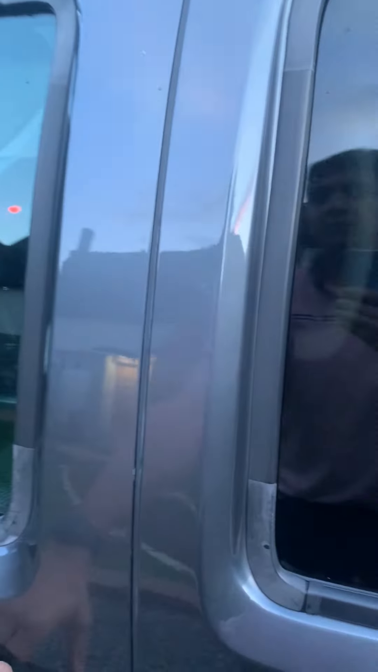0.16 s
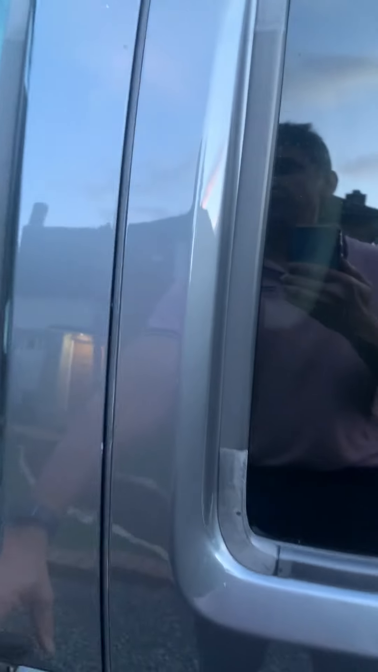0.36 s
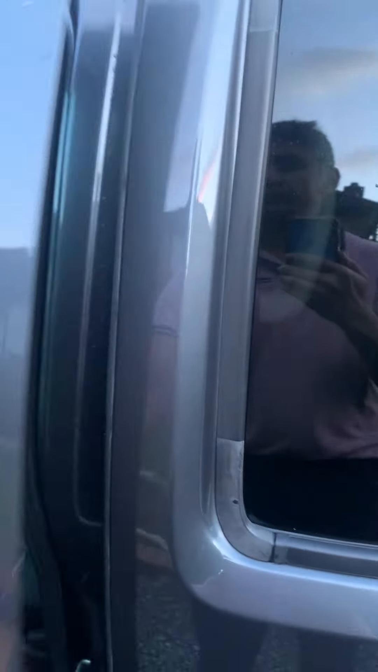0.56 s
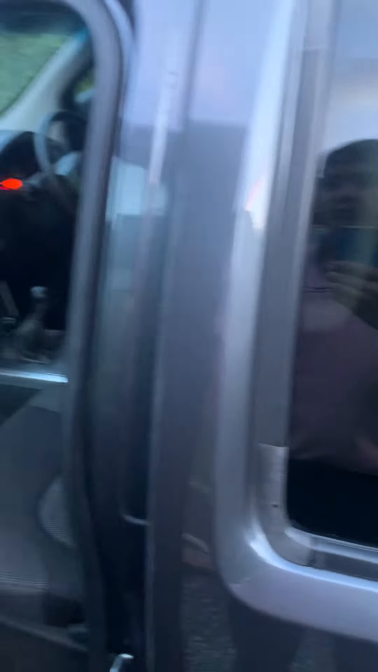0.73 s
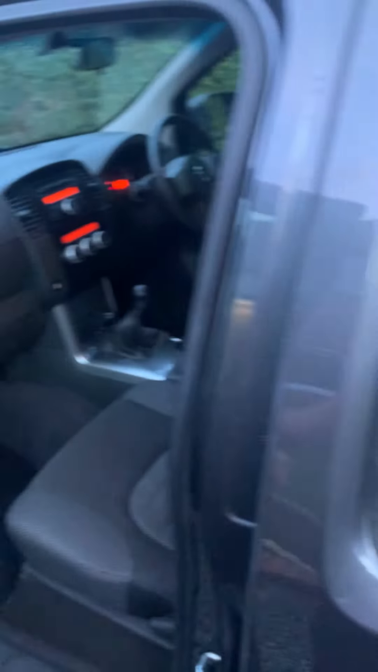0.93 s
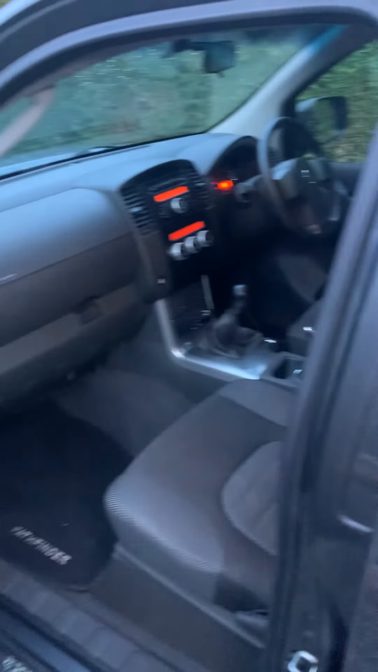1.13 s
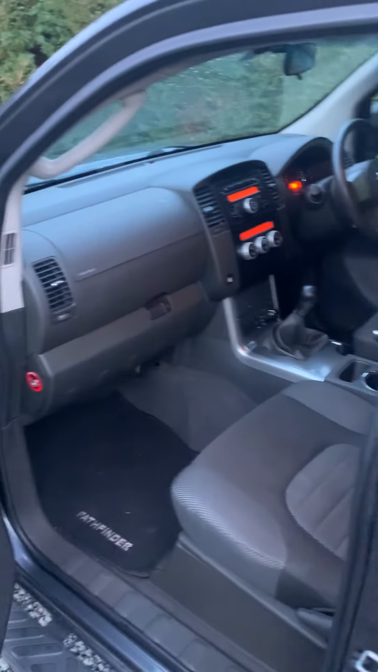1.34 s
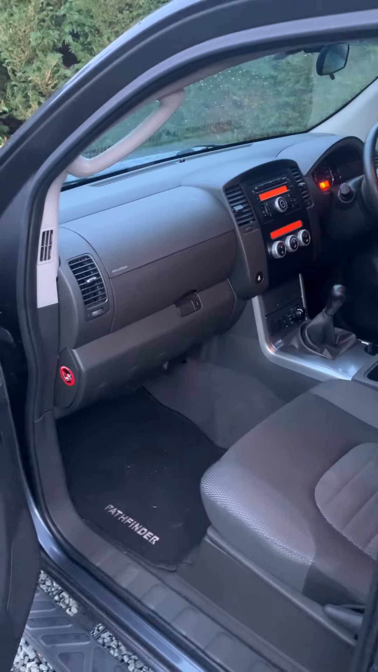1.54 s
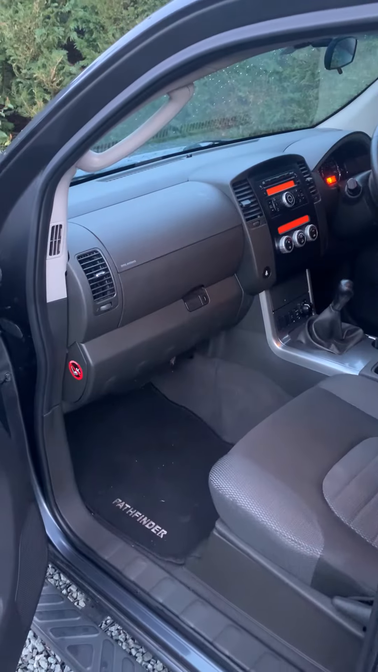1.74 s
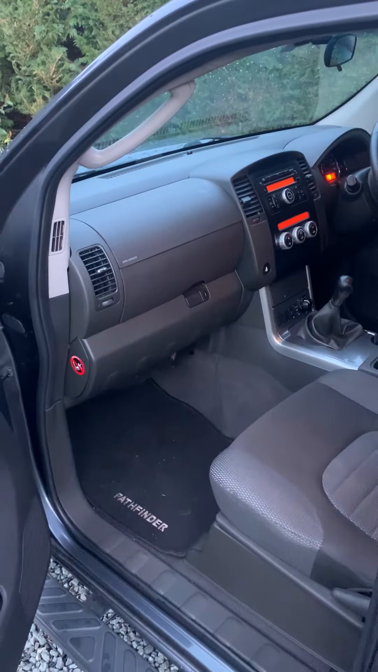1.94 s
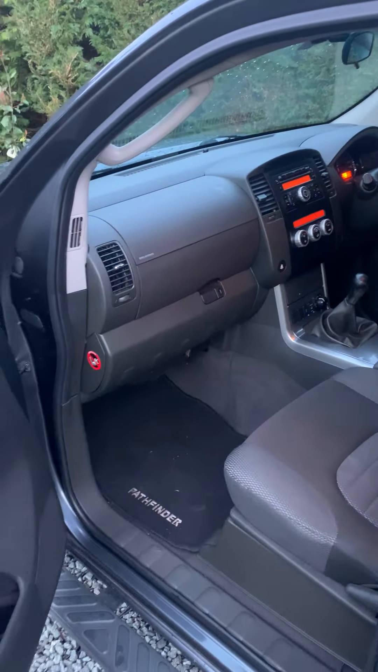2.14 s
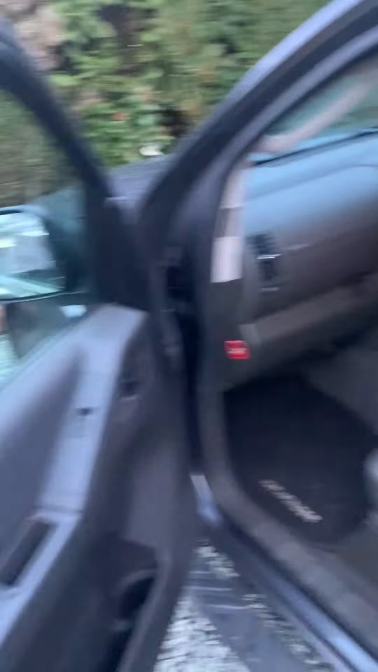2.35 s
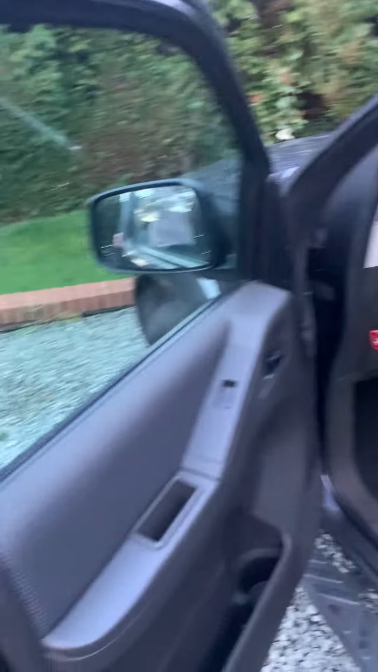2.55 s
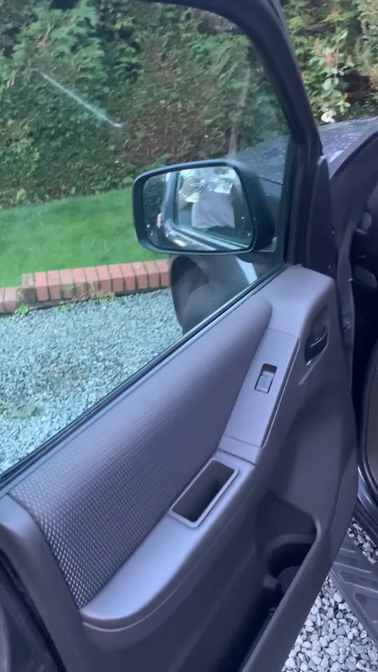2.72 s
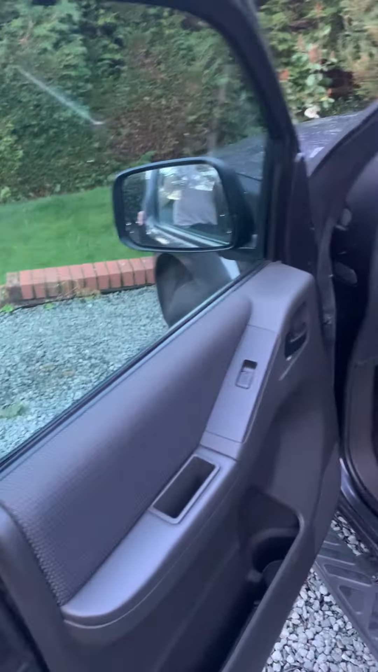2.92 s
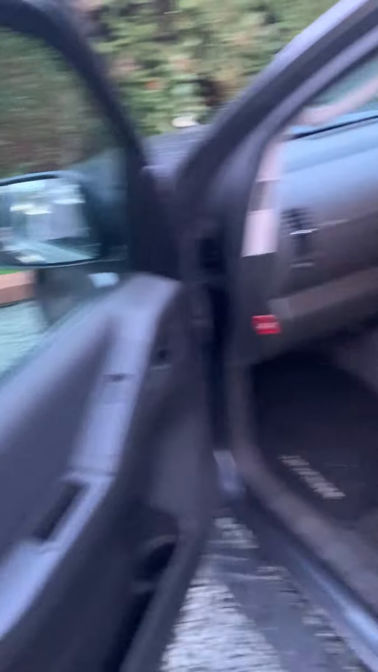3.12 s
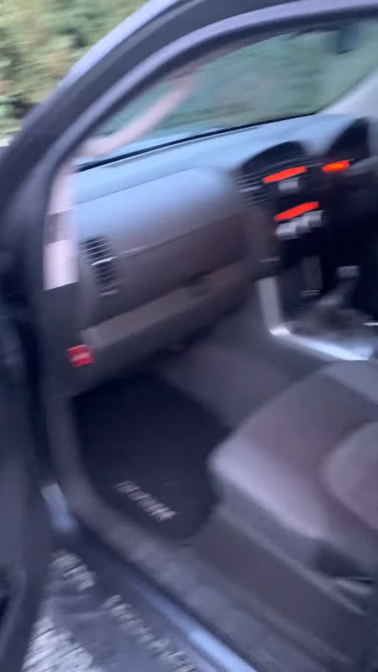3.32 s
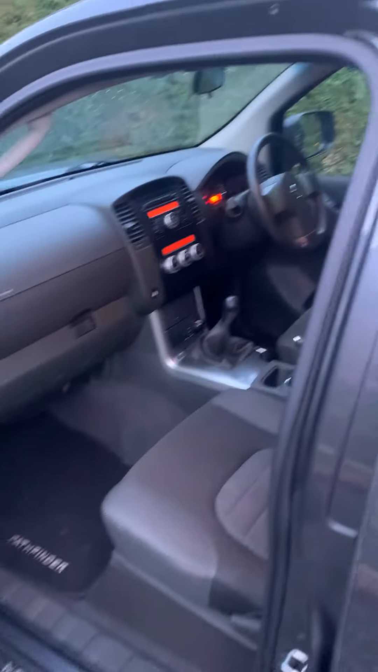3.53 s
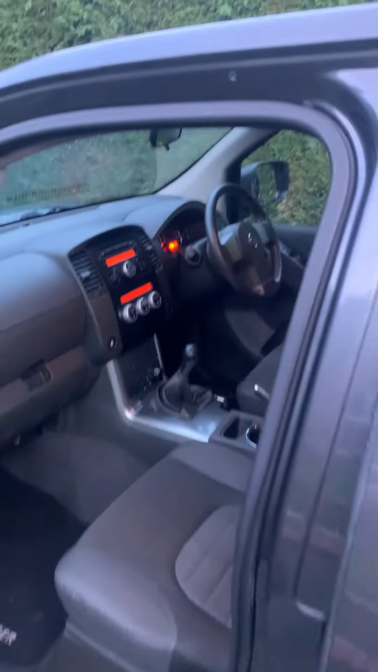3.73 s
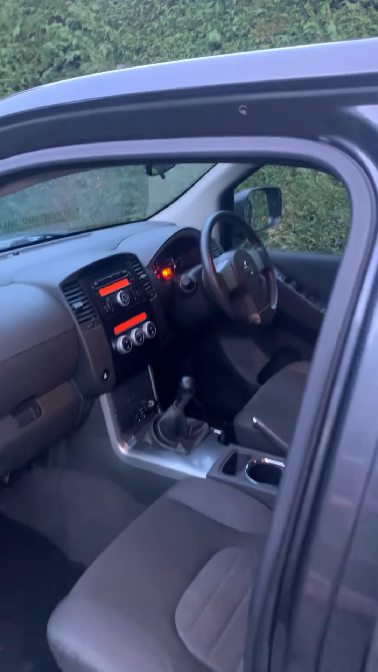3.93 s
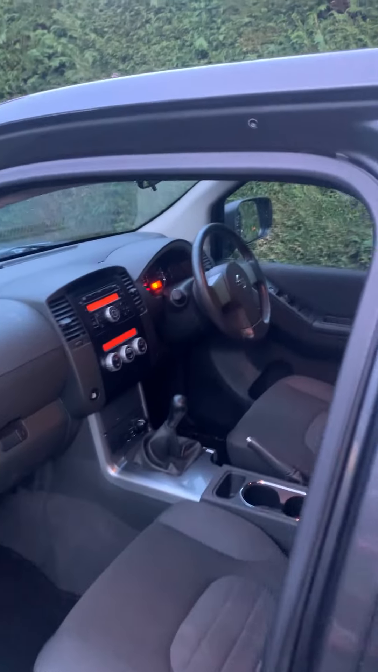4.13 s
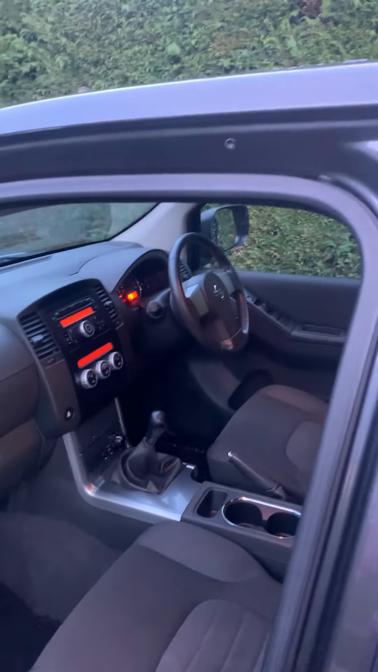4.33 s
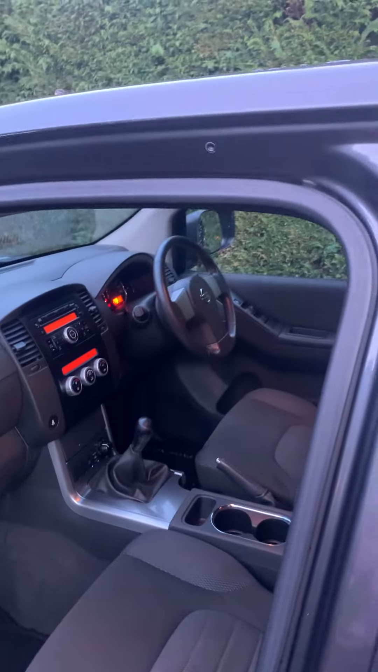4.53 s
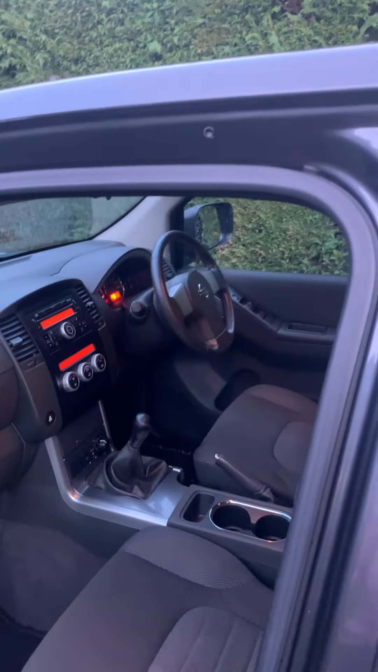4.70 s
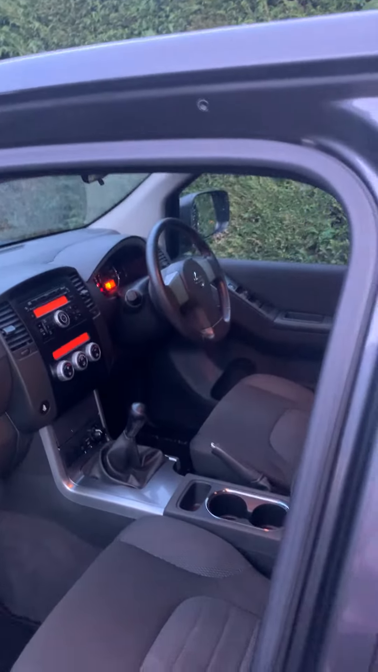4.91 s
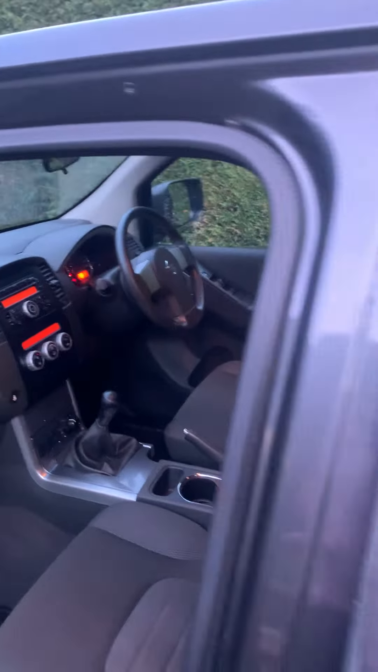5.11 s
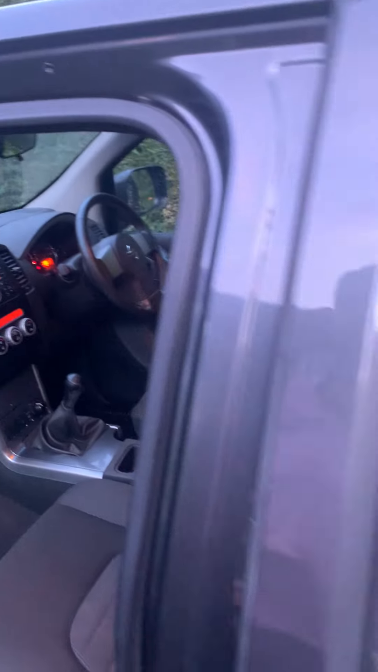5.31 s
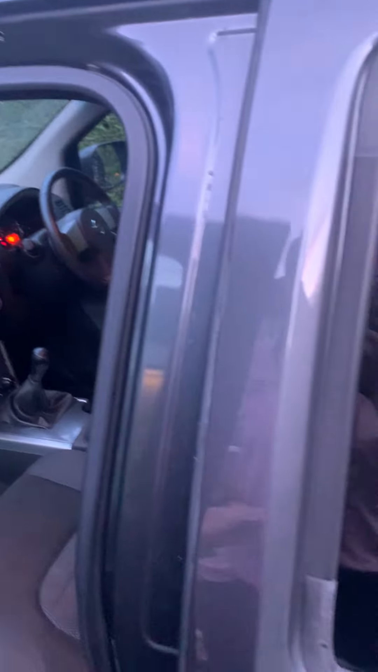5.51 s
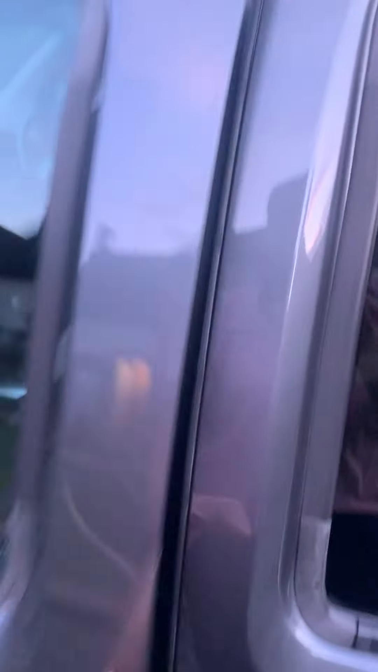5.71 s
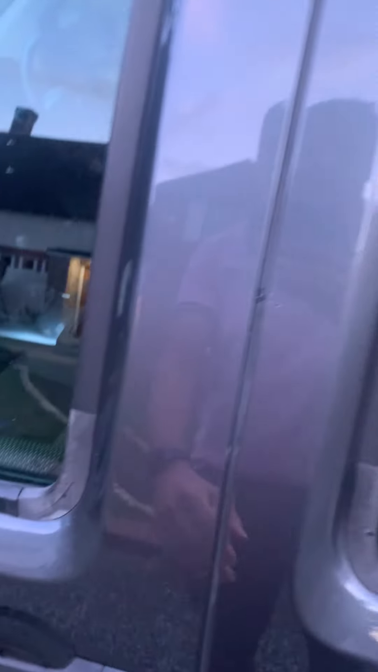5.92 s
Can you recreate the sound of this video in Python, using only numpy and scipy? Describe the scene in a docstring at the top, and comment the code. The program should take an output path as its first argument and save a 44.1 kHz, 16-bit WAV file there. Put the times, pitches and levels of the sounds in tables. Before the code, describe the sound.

Outdoors, a hand-held phone close to a pickup picks up its rough diesel idle. The passenger door is unlatched with a hollow clunk, then bumps and rattles at full opening. The engine purrs and clatters alone, a few muffled low footsteps thump, and finally the door shuts with an explosive metallic crunch and deep panel boom, bouncing and rattling briefly in stereo.

```python
"""On a gravel drive a four-cylinder diesel pickup idles. Someone beside it pulls the passenger door open,
lets it swing to its stop, shifts their feet and slams it right next to a hand-held phone.
The engine is harmonics of the firing rate, noise pulsed by the firings and a fan tone beating against them.
The door is a modal panel excited by pushes, chattering resonant steel and a chinking rod;
footfalls are low pulses, and clothes, grit, hinge and air are filtered noise."""
import sys
import numpy as np
from scipy import signal
from scipy.fft import rfft, irfft
from scipy.io import wavfile
from scipy.ndimage import uniform_filter1d

SR = 44100
rng = np.random.default_rng(int(sys.argv[2]) if len(sys.argv) > 2 else 0)


def digitize_waveform(pressure):
    """Quantize a signal to 16-bit integers and store it at the path in sys.argv[1].

    Rows of a 2-D input are taken as channels; values are limited to [-1, 1].
    """
    field = np.atleast_2d(pressure).T
    bounded = np.clip(field, -1, 1)
    quanta = np.round(bounded * 32767).astype(np.int16)
    wavfile.write(sys.argv[1], SR, quanta)


N = 262836
T = np.arange(N) / SR  # s

# Harmonics of the firing rate, exhaust drone then block hum from the ninth: order [multiple], level_db [dB]
FIRING_ORDERS = [(1, -0.5), (2, 6), (3, 5), (4, 0), (5, 0), (6, -5.5), (7, -12.5), (8, -12.5), (9, -6.5),
                 (10, -7.5), (11, -9.5), (12, -12), (13, -3), (14, -27), (15, -9.5), (16, -12.5), (17, -16),
                 (18, -26)]
# Relative noise spectra, all with columns: frequency_hz [Hz], level_db [dB per Hz]
# knock in the block
KNOCK_SPECTRUM = [(100, -2), (150, -11.5), (200, 0), (260, -1.5), (320, 0), (400, -4.5), (550, -13.5),
                  (1500, -29), (8000, -50)]
# valve and piston clatter
CLATTER_SPECTRUM = [(300, -3), (400, 0), (540, -10), (720, -7), (1000, -6), (1300, -10.5), (1650, -13),
                    (2200, -25.5), (3600, -79), (5000, -26), (8000, -43), (15000, -45)]
# injector ticks
INJECTOR_SPECTRUM = [(1200, 0.5), (2200, 3), (3500, 1), (5000, -3), (6100, -7.5), (6650, 4), (7700, -13.5),
                     (11000, -16.5), (15500, -10)]
# moving outdoor air
AIR_SPECTRUM = [(42, -17), (60, 2), (110, -3), (200, -12), (600, -27), (3000, -33.5), (15000, -67)]
# rubbing surfaces: cloth, stones, hinge
FRICTION_SPECTRUM = [(150, 16), (600, 6), (2000, 6), (4000, 5.5), (7000, -1.5), (10000, -10.5), (15500, -8)]
# shudder of the body, and the hand on the phone
RUMBLE_SPECTRUM = [(45, -1), (75, -2), (160, -7), (260, -22), (500, -32), (2000, -70)]
# chatter of the latch
LATCH_SPECTRUM = [(120, -25), (350, 4), (520, 4), (700, 4), (1250, 6), (2200, -0.5), (3000, 1.5),
                  (4000, -3.5), (6000, -2), (8000, -11), (11000, -13.5), (15500, -20)]
# cabin and trim shaking on after the panel
TAIL_SPECTRUM = [(30, -3), (70, 13), (170, 14.5), (280, 10), (420, -2), (560, -13), (1200, -16),
                 (2500, -57), (6000, -46), (15000, -47)]

# Sound arriving from the sides: frequency_hz [Hz], side_minus_mid_db [dB]
STEREO_SPREAD = [(60, -31), (300, -19.5), (700, -7), (1200, -9), (2400, -6), (3800, -3), (6700, -49),
                 (15000, -39)]
# Phase by which the right port lags the left: frequency_hz [Hz], lag_rad [rad]
PORT_PHASE_LAG = [(0, 0), (1500, .3), (2400, 1.6), (3500, 1.6), (4700, 3.14), (6800, 6.28), (9000, 9.42),
                  (13300, 15.7), (22050, 28.3)]

# Loudness of the car's parts as the phone moves about:
# time_s [s], engine_bay_db [dB], exhaust_db [dB], hum_db [dB, added to the hum but not the knock]
PHONE_PLACE = [(0, 2, 1, -2), (1.2, 0.5, 1.5, -1.5), (1.7, 0.9, -0.5, 1.5), (2.1, 1, -2.5, -0.5),
               (2.8, 2.2, -2, 0), (3.8, 0, 2, -1.5), (4.6, -2, 0, -4.5), (5.3, -2.5, -1.5, -4.5),
               (5.96, 1.5, -2.5, -9)]
# Brief changes of the idle, mostly dips: time_s [s], length_s [s], hum_db [dB], clatter_db [dB]
IDLE_DIPS = [(1.355, 0.043, -27, 0.5), (3.442, 0.01, -8, -4), (3.864, 0.0095, -9, 0)]
# Engine bay and cabin resonances rung by the clatter: frequency_hz [Hz], width_hz [Hz], level_db [dB]
BAY_RESONANCES = [(575, 32, 7), (722, 38, 5), (861, 30, 3), (996, 46, 1), (1176, 38, 4.5), (1323, 71, 0.5),
                  (1590, 17, 3.5)]
# Strength of each injector in firing order: level_db [dB, relative]
INJECTOR_STRENGTHS = [2.5, 4, 1.5, 1]

# Clothes rustling while the arm works the door: start_s [s], end_s [s], level_db [dB]
RUSTLE_SPANS = [(-.1, 0.89, -53), (3.75, 4.044, -58), (5.58, 6.102, -54.5)]
# Body shuddering against the open door, hand shifting on the phone: time_s [s], level_db [dB], length_s [s]
RUMBLE_EVENTS = [(.02, -32.5, 0.061), (1.071, -27, 0.027), (3.587, -31, 0.041)]
# Short clicks and bursts of steel-like noise about the door, some just ahead of a slam: time_s [s], level_db
# [dB], t60_s [s], tilt_db [dB per octave about 2 kHz], ring_db [dB]
CLICK_EVENTS = [(.060, -38.5, 0.013, 0.5, -7), (.191, -45.5, 0.15, 9, -15), (.360, -43, 0.066, 9, -8),
                (.378, -38, 0.068, 6, -11), (.387, -36.5, 0.11, 8, -8), (.4375, -26, .02, 1, 0),
                (.447, -33, 0.15, 10, -10), (.455, -27, 0.03, -5, -12), (.470, -29, 0.021, 3, -6),
                (.476, -35.5, 0.063, 1, -6), (.847, -36.5, 0.057, 4.5, -10), (.859, -28, 0.028, 2, -6),
                (.8715, -26, .02, -2, -7), (.878, -20.5, 0.037, -5, -8), (.889, -29, .04, -7.5, 3),
                (.899, -31, 0.26, -15, -0.5), (1.419, -40.5, 0.15, -14, 6), (5.803, -31.5, 0.21, -5, -8),
                (5.814, -21, 0.075, 0, 17), (5.8315, -15.5, 0.016, 0, 0), (5.841, -16, 0.041, -1, -10),
                (5.852, -21, .06, -2.5, 0), (5.8615, -18.5, 0.061, -1.5, 0), (5.884, -21.5, 0.024, 0, 1),
                (5.926, -28, 0.06, -4.5, -5)]
# Steel modes of latch and striker: pitch_hz [Hz], level_db [dB], sustain [ring time / contact time]
STEEL_MODES = [(645, -3, 1.4), (775, 10.5, 0.29), (899, -0.5, 1), (1055, -2, 0.76), (1205, 8.5, 0.3),
               (1584, -18, 2), (1744, -7.5, 3.4), (2060, -14, 1.5), (2390, -8, .6), (2906, -17, 2.7),
               (3570, 1, 0.42), (3980, -11, 1.4), (5300, -10, 1.1)]
# Air shoved by the door's weight: time_s [s], level_db [dB], pitch_hz [Hz], length_s [s]
HEAVE_EVENTS = [(.410, -23, 86, 0.02), (.439, -12.5, 165, 0.0079), (.498, -21, 112, 0.0082),
                (.942, -28, 79, 0.0038), (1.050, -23, 190, 0.0087), (1.066, -18.5, 61.5, 0.014),
                (5.850, -5, 108, 0.004), (5.885, -14.5, 48, 0.034), (5.924, -8.5, 91, 0.0049)]
# Latch lets go, door meets its check, reaches its stop, slams:
# time_s [s], snap_lead_s [s], snap_db [dB], crunch_db [dB], tilt_db [dB per octave]
IMPACT_EVENTS = [(.431, 0.0036, -33, -26.5, 0), (0.872, .0135, -30, -27.5, -2),
                 (1.024, 0.0059, -55, -47, -1.5), (5.8307, 0.0037, -8.5, -14.5, 1)]
# Door skin booming after an impact and again on its bounces: time_s [s], level_db [dB], pitch_hz [Hz]
BOOM_EVENTS = [(0.4337, -5.5, 430), (0.441, -15, 180), (.446, -16.5, 423), (.461, -17, 420),
               (.480, -19.5, 410), (0.8704, -19.5, 383), (.889, -18, 332), (0.902, -29, 335),
               (1.0261, -18.5, 310), (1.046, -17, 258), (1.059, -23.5, 370), (1.079, -29, 236),
               (5.837, 7, 283), (5.847, -3.5, 211), (5.863, 0, 305), (5.892, -21, 173), (5.915, -23, 150)]
# Door panel and cabin modes: pitch_hz [Hz], level_db [dB, before weighting by nearness], t60_s [s]
PANEL_MODES = [(57, 12, 0.68), (75.4, 4, .63), (108, 13.5, 0.22), (172, 4.5, 0.3), (211, 10.5, 0.11),
               (288.5, 11.5, 0.13), (314.6, 12, 0.11), (372.5, 10.5, 0.15), (407, 13.5, 0.11),
               (455.4, 3, 0.38), (654, 13, 0.069), (873, 25, 0.15)]
# Jolts of the lock rod: time_s [s], level_db [dB]
CHINK_EVENTS = [(.471, -44), (.847, -41), (.860, -28.5), (5.852, -22), (5.884, -27.5)]
# Modes of the thin lock rod: pitch_hz [Hz], level_db [dB], t60_s [s]
ROD_MODES = [(3450, -6, 0.027), (4060, -2.5, 0.034), (4270, 3, .035)]
# Footfalls felt through the hand: time_s [s], level_db [dB], pitch_hz [Hz], length_s [s]
STEP_EVENTS = [(3.39, -27.5, 106, 0.0033), (3.438, -26, 60, 0.016), (3.528, -21.5, 84, 0.003),
               (3.560, -20, 75, 0.0066), (3.589, -22, 140, 0.0067), (3.611, -33, 70.4, 0.009),
               (3.704, -18.5, 59.7, 0.0043)]
# Stones grinding under a shoe: time_s [s], level_db [dB], pitch_hz [Hz], length_s [s]
GRIT_EVENTS = [(3.754, -53, 4140, 0.0086), (3.798, -47.5, 3670, 0.0031), (3.916, -52, 6260, .005)]

FIRING_HZ, SAG_HZ_PER_S = 22.53, .016  # rate at the start, and its steady fall
DRONE_DB, BLOCK_DB, CLATTER_DB, INJECTOR_DB = -35.5, -46.5, -47, -61
# dB each layer moves per dB of the engine bay: the body shades the ticks most
BLOCK_SHADE, CLATTER_SHADE, INJECTOR_SHADE = 1.06, 0.75, 1.34
FAN_HZ, FAN_DB = 65.7, -8.5  # just under the third order; level against the drone
BAY_WAVER_DB = 3.5  # each bay resonance swells and sinks on its own
TICK_WANDER = 0.005  # unevenness of injector timing, in firing cycles
TICK_DB = -10  # the needle's sharp strokes against the ring
RUSTLE_FADE_S = 0.044
SNAP_RISE_S, CRUNCH_RISE_S, CLICK_RISE_S = 0.0025, 0.0012, 0.0007
SNAP_T60_S, SNAP_TILT_DB, SNAP_RING_DB = 0.086, 6, -14  # base tilt per octave: bright
CRUNCH_T60_S, CRUNCH_TILT_DB, CRUNCH_RING_DB = 0.2, -4.5, -4  # base tilt per octave: dull
STRIKE_DB, STRIKE_T60_S = -1, .011  # hard first instant of a contact, against its chatter
BARE_DB, RESONANT_DB, STEEL_Q = -2.5, -7, 26.3  # chatter heard directly and through the steel
CONTACT_CYCLES = 0.63  # a push lasts this share of a cycle of its pitch
HINGE_S, HINGE_LENGTH_S, HINGE_HZ, HINGE_DB = 5.55, 0.11, 5240, -63
TOP_HZ = 15650  # upper band edge


def undb(db):
    """Logarithmic level: decibels become an amplitude ratio."""
    return 10 ** (np.asarray(db) / 20)


def unit(x):
    """Normalisation of power: scale to rms 1."""
    return x / np.sqrt(np.mean(x ** 2))


def curves(table):
    """Linear interpolation: each column becomes a curve in time."""
    s, *columns = np.transpose(table)
    return [np.interp(T, s, c) for c in columns]


def colour(x, spectrum, tilt_db=0):
    """Spectral shaping: a tabled curve tilted per octave about 2 kHz, with bass rolled off below it."""
    hz, db = np.transpose(spectrum)
    f = np.maximum(np.fft.rfftfreq(x.shape[-1], 1 / SR), 1)
    gain = undb(np.interp(np.log(f), np.log(hz), db) + tilt_db * np.log2(f / 2000))
    rolloff = np.sqrt(1 + (.5 * hz[0] / f) ** 6)
    return irfft(rfft(x) * gain / rolloff, x.shape[-1])


def noise(spectrum, size=N, tilt_db=0, width_db=0):
    """Partial coherence: coloured mid and side noise makes two partly alike ports, rms 1."""
    mid, side = rng.standard_normal((2, size))
    side = undb(width_db) * colour(side, STEREO_SPREAD)
    return unit(colour(np.array([mid + side, mid - side]), spectrum, tilt_db))


def add(out, s, sound):
    """Superposition: mix a sound in at time s."""
    i = int(s * SR)
    part = sound[..., :N - i]
    out[:, i:i + part.shape[-1]] += part


def fade(t, t60):
    """Exponential damping: 60 dB of decay in t60."""
    return np.exp(-np.log(1000) * t / t60)


def walk(rate, size=N):
    """Smoothed random fluctuation of rms 1, from rate fresh values per second."""
    hold = int(SR / rate)
    steps = np.repeat(rng.standard_normal(size // hold + 1), hold)
    return unit(uniform_filter1d(steps, hold)[:size])


def swell(s, length):
    """Gaussian envelope: a smooth rise and fall about time s, with length its standard deviation."""
    return np.exp(-.5 * ((T - s) / length) ** 2)


def resonate(x, hz, width):
    """Simple resonance: a two-pole peak with unit gain at its centre."""
    return signal.lfilter(*signal.iirpeak(hz, hz / width, fs=SR), x)


def bumps(table):
    """Pressure pulses: low tones under short Gaussian envelopes."""
    return sum(undb(db) * swell(s, length) * np.cos(2 * np.pi * hz * (T - s))
               for s, db, hz, length in table)


def bursts(cycle, at, rise, decay, scatter_db):
    """Periodic excitation: one burst of random strength in every cycle; times in cycles."""
    number, age = np.divmod(cycle - at + 2, 1)
    strengths = undb(scatter_db * np.sqrt(3) * rng.uniform(-1.03, 1, N // 100))
    envelope = (1 - np.exp(-age / rise)) * np.exp(-age / decay)
    return unit(uniform_filter1d(strengths[number.astype(int)] * envelope, size=32))


def orders(cycle, dispersion=.62, side_db=-6, sway_db=2.6):
    """Harmonic series with dispersion: higher orders waver more; pipe and body delay them unequally."""
    lines = []
    for k, db in FIRING_ORDERS:
        phase = 2 * np.pi * k * (cycle - .47) + dispersion * k ** 2
        unrest = min(k / 8, 1)
        mid = undb(unrest * sway_db * walk(9)) * np.cos(phase + .22 * unrest * walk(8))
        side = undb(side_db) * walk(2.4) * np.sin(phase)  # the phone drifts through standing waves
        lines.append(undb(db) * np.array([mid + side, mid - side]))
    return lines


def exhaust_and_fan(low_lines, hum_dip):
    """Beating: the fan tone lies close to the third order of the firing drone."""
    drone = unit(sum(low_lines[:3]) + hum_dip * sum(low_lines[3:]))
    fan = undb(FAN_DB) * np.cos(2 * np.pi * FAN_HZ * T + .5 * walk(2))
    return drone + fan


def engine_block(cycle, high_lines, hum_db, hum_dip):
    """Structure-borne sound: the block hums in high orders and knocks once per firing."""
    hum = undb(hum_db) * unit(sum(high_lines))
    pulses = bursts(cycle, at=0.472, rise=0.036, decay=0.98, scatter_db=2.5)
    knock = undb(-2) * pulses * noise(KNOCK_SPECTRUM)
    return hum_dip * (hum + knock)


def repeating(cycle, spectrum):
    """Periodicity: the same rattle of parts is played again on every firing."""
    size = int(SR / FIRING_HZ)
    position = cycle % 1 * size
    return np.array([np.interp(position, np.arange(size), port) for port in noise(spectrum, size=size)])


def mechanical_clatter(cycle, repeat_db=-3, bay_db=-3.0, flutter_db=0.7, throb_db=0.7):
    """Forced resonance: valves rattle three times a firing; pistons slap twice and ring the bay."""
    rattle = noise(CLATTER_SPECTRUM) + undb(repeat_db) * repeating(cycle, CLATTER_SPECTRUM)
    valves = bursts(3 * cycle, at=0.913, rise=0.032, decay=2.8, scatter_db=1.4) * rattle
    strokes = bursts(2 * cycle, at=0.827, rise=0.029, decay=0.77, scatter_db=2.0)
    slap = strokes * noise(CLATTER_SPECTRUM)
    bay = sum(undb(db + BAY_WAVER_DB * walk(12)) * resonate(slap, hz, width)
              for hz, width, db in BAY_RESONANCES)
    level_db = flutter_db * walk(20) + throb_db * np.cos(2 * np.pi * cycle)
    return undb(level_db) * (valves + undb(bay_db) * unit(bay))


def injection(cycle, at=0.867):
    """Impulsive excitation: each needle snaps open and shut, and the head rings on."""
    cycle = cycle + TICK_WANDER * walk(36)
    number = np.floor(cycle - at + 2).astype(int)
    cylinder = undb(INJECTOR_STRENGTHS)[number % len(INJECTOR_STRENGTHS)]
    opens = bursts(cycle, at=at, rise=.01, decay=.05, scatter_db=3)
    shuts = bursts(cycle, at=at + .14, rise=.01, decay=.05, scatter_db=3.5)
    ring = bursts(cycle, at=at, rise=.09, decay=.45, scatter_db=2.3)
    strokes = undb(TICK_DB) * unit(opens + shuts)
    return unit(cylinder * (ring + strokes)) * noise(INJECTOR_SPECTRUM)


def engine():
    """Common periodicity: one slowly sagging firing cycle drives drone, block, clatter and ticks."""
    front_db, exhaust_db, hum_db = curves(PHONE_PLACE)
    cycle = np.cumsum(FIRING_HZ - SAG_HZ_PER_S * T) / SR
    hum_dip = undb(sum(db * swell(s, length) for s, length, db, _ in IDLE_DIPS))
    clatter_dip = undb(sum(db * swell(s, length) for s, length, _, db in IDLE_DIPS))
    lines = orders(cycle)
    drone = exhaust_and_fan(lines[:8], hum_dip)
    block = engine_block(cycle, lines[8:], hum_db, hum_dip)
    clatter = clatter_dip * mechanical_clatter(cycle)
    out = undb(DRONE_DB + exhaust_db) * drone
    out += undb(BLOCK_DB + BLOCK_SHADE * front_db) * block
    out += undb(CLATTER_DB + CLATTER_SHADE * front_db) * clatter
    out += undb(INJECTOR_DB + INJECTOR_SHADE * front_db) * injection(cycle)
    return out


def outdoor_air():
    """Broadband flow noise: softly moving air whose level wanders."""
    return undb(-43.5 + 1.5 * walk(4)) * noise(AIR_SPECTRUM, width_db=3)


def clothes():
    """Frictional noise: cloth rustles, with a fluttering level, while the arm moves."""
    moving = 0
    for start, end, db in RUSTLE_SPANS:
        begun = np.tanh((T - start) / RUSTLE_FADE_S)
        ended = np.tanh((T - end) / RUSTLE_FADE_S)
        moving = moving + undb(db) * (begun - ended) / 2
    return moving * undb(1.0 * walk(74)) * noise(FRICTION_SPECTRUM)


def rumbles():
    """Low-frequency random vibration: uneven shudders swell and die away."""
    return sum(undb(db) * swell(s, length) for s, db, length in RUMBLE_EVENTS) * noise(RUMBLE_SPECTRUM)


def clack(rise_s, t60, tilt_db, ring_db, yard_db=-30, yard_t60=0.66, detune=0.004, chatter_db=2.0):
    """Impact and modal decay: steel strikes, chatters and rings on; the yard answers faintly."""
    t = T[:2 ** 14]
    hz, mode_db, sustain = np.transpose(STEEL_MODES)[:, :, None]
    hz = hz * (1 + detune * rng.standard_normal(hz.shape))  # the load on the steel differs at every contact
    chatter = fade(t, t60) * unit(undb(chatter_db * walk(600, size=len(t))))
    strike = undb(STRIKE_DB) * fade(t, STRIKE_T60_S)
    force = strike + chatter + undb(yard_db) * fade(t, yard_t60)
    bare = force * noise(LATCH_SPECTRUM, size=len(t), tilt_db=tilt_db, width_db=0.0)
    resonant = sum(resonate(bare, f, f / STEEL_Q) for f in hz[:, 0])
    crack = undb(BARE_DB) * bare + undb(RESONANT_DB) * resonant
    weight = undb(mode_db + tilt_db * np.log2(hz))  # a rising tilt favours the high modes
    weight = weight / np.linalg.norm(weight)
    tones = np.sin(2 * np.pi * (hz * t + rng.random(hz.shape)))
    modes = weight * tones * fade(t, sustain * t60)
    return (crack + undb(ring_db) * modes.sum(axis=0)) * (1 - np.exp(-t / rise_s))


def clicks():
    """Brief impacts: short clicks and bursts about the door, synthesised as steel contacts."""
    out = np.zeros((2, N))
    for s, db, t60, tilt_db, ring_db in CLICK_EVENTS:
        add(out, s, undb(db) * clack(CLICK_RISE_S, t60, tilt_db, ring_db))
    return out


def door_heaves():
    """Volume displacement: the door's weight shoves the air in low pulses."""
    return bumps(HEAVE_EVENTS)


def latch_impacts():
    """Paired contacts: the bright, dry pawl snaps just before the striker takes the load and crunches."""
    out = np.zeros((2, N))
    for s, lead_s, snap_db, crunch_db, tilt_db in IMPACT_EVENTS:
        snap = clack(SNAP_RISE_S, SNAP_T60_S, SNAP_TILT_DB + tilt_db, SNAP_RING_DB)
        crunch = clack(CRUNCH_RISE_S, CRUNCH_T60_S, CRUNCH_TILT_DB + tilt_db, CRUNCH_RING_DB)
        add(out, s - lead_s, undb(snap_db) * snap)
        add(out, s, undb(crunch_db) * crunch)
    return out


def thud(pitch_hz, tail_db=-23, tail_t60=0.63, swell_s=0.001, favour_db=13, port_skew=0.16):
    """Modal excitation: a push favours door modes near its pitch; cabin and trim shake on."""
    t = T[:2 ** 15]
    hz, mode_db, t60 = np.transpose(PANEL_MODES)[:, :, None]
    skew = port_skew * rng.standard_normal(hz.shape)  # each mode reaches the two ports out of step
    modes = np.sin(2 * np.pi * hz * t + np.array([skew, -skew])) * fade(t, t60)
    octaves_away = np.abs(np.log2(hz / pitch_hz))
    ring = np.sum(modes * undb(mode_db - favour_db * octaves_away), axis=1)
    push = np.sin(np.pi * np.minimum(t * pitch_hz / CONTACT_CYCLES, 1))  # a longer contact is duller
    boom = signal.fftconvolve(ring, push[None])[:, :len(t)]
    tail_envelope = fade(t, tail_t60) * (1 - np.exp(-t / swell_s))
    tail = noise(TAIL_SPECTRUM, size=len(t), width_db=-14) * tail_envelope
    return boom / np.abs(boom).max() + undb(tail_db) * tail


def panel_booms():
    """Repeated excitation: the door's skin booms at impacts and as it bounces on seal or stop."""
    out = np.zeros((2, N))
    for s, db, pitch_hz in BOOM_EVENTS:
        add(out, s, undb(db) * thud(pitch_hz))
    return out


def rod_chinks():
    """Free vibration: each jolt makes the thin lock rod ring briefly in its modes."""
    t = T[:2 ** 13]
    chink = sum(undb(db) * np.sin(2 * np.pi * hz * t) * fade(t, t60) for hz, db, t60 in ROD_MODES)
    out = np.zeros((2, N))
    for s, db in CHINK_EVENTS:
        add(out, s, undb(db) * chink)
    return out


def footfalls():
    """Impulsive loading: each footfall is a dull bump, of opposite polarity to the heaves."""
    return -bumps(STEP_EVENTS)


def grit():
    """Narrow-band friction: stones grind under a shoe with a thin hiss."""
    friction = noise(FRICTION_SPECTRUM)
    return sum(undb(db) * swell(s, length) * unit(resonate(friction, hz, hz / 5))
               for s, db, hz, length in GRIT_EVENTS)


def hinge():
    """Resonant friction: the hinge whispers as the door swings shut."""
    whisper = unit(resonate(noise(FRICTION_SPECTRUM), HINGE_HZ, 200))
    return undb(HINGE_DB) * swell(HINGE_S, HINGE_LENGTH_S) * whisper


def scene():
    """Linear superposition of engine, air, person and door."""
    surroundings = engine() + outdoor_air() + rumbles()
    person = clothes() + footfalls() + grit()
    door = clicks() + door_heaves() + latch_impacts() + panel_booms() + rod_chinks() + hinge()
    return surroundings + person + door


def record(dry):
    """Phase lag, saturation and band limiting: the right port lags, peaks round, both band ends are cut."""
    lag = np.interp(np.fft.rfftfreq(2 * N, 1 / SR), *np.transpose(PORT_PHASE_LAG))
    right = irfft(rfft(dry[1], 2 * N) * np.exp(-1j * lag))[:N]
    ports = .9 * np.tanh(np.array([dry[0], right]) / .9)
    ports = signal.sosfilt(signal.butter(2, 12, "highpass", fs=SR, output="sos"), ports)
    return signal.sosfilt(signal.ellip(10, .2, 70, TOP_HZ, fs=SR, output="sos"), ports)


dry = scene()
out = record(dry)
digitize_waveform(out)
```